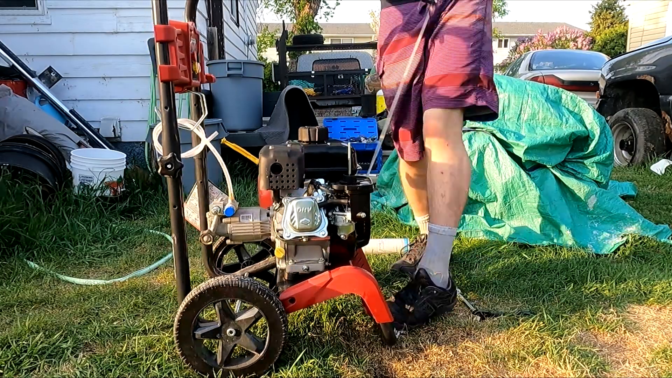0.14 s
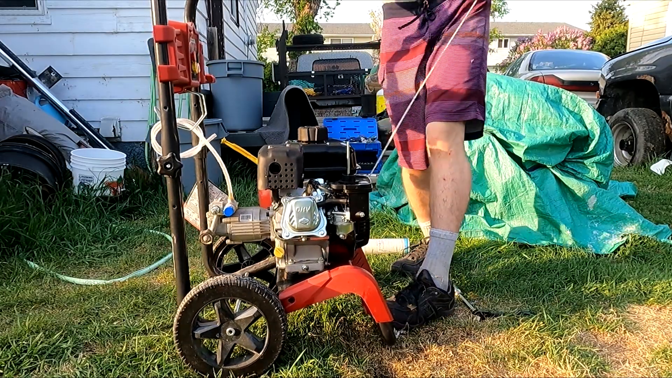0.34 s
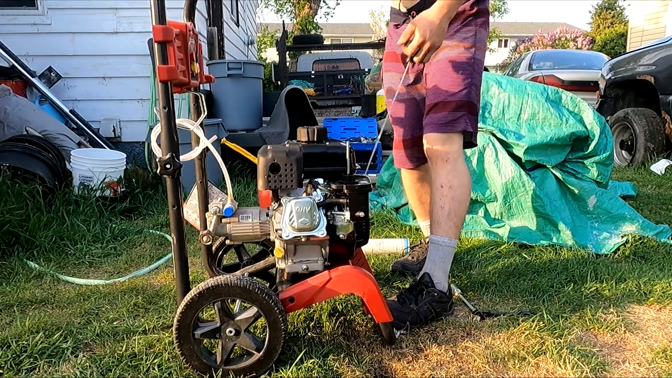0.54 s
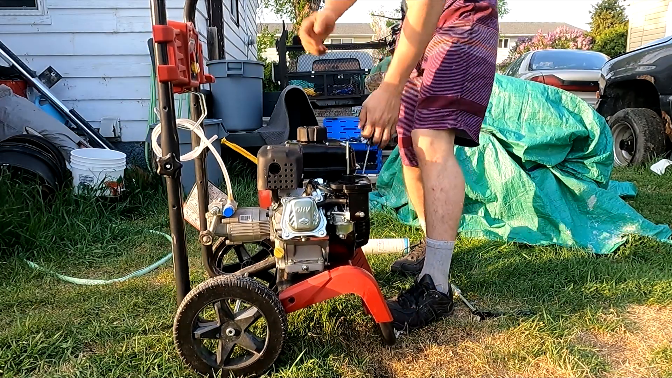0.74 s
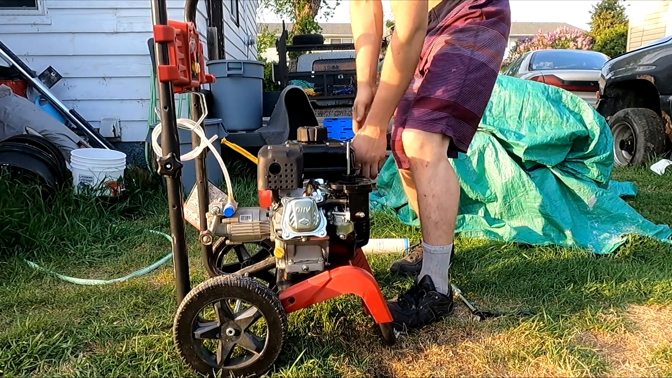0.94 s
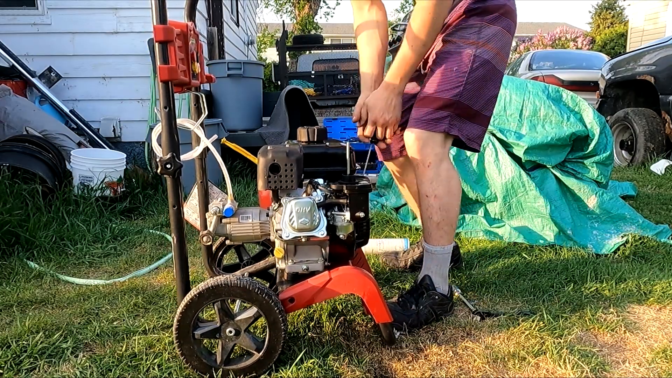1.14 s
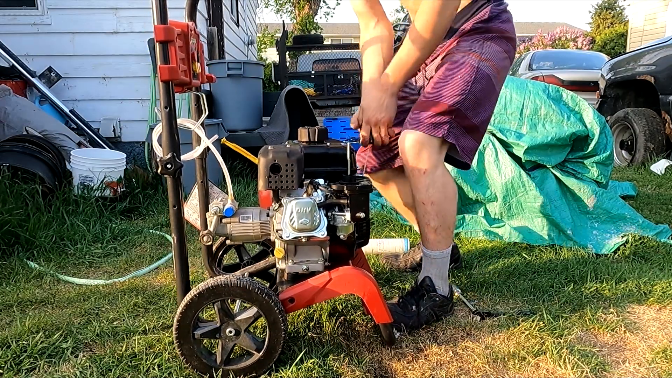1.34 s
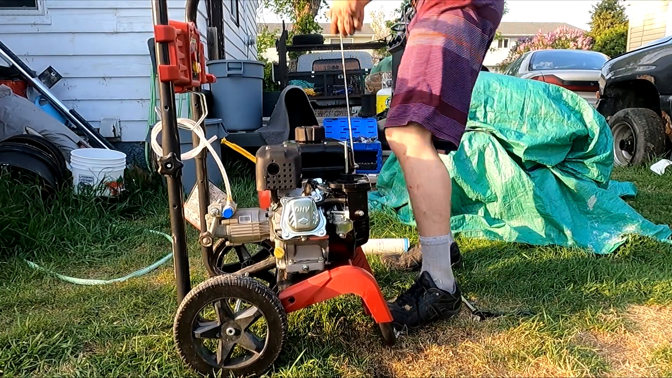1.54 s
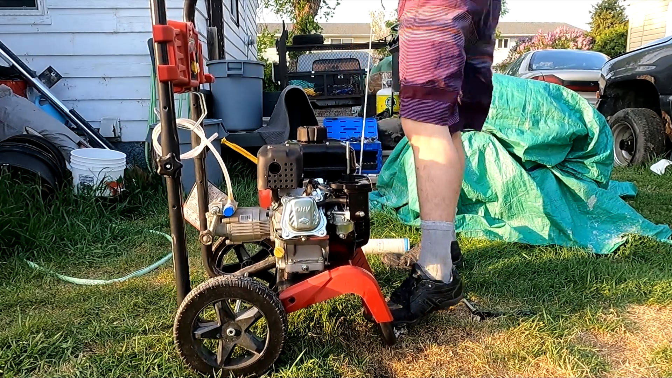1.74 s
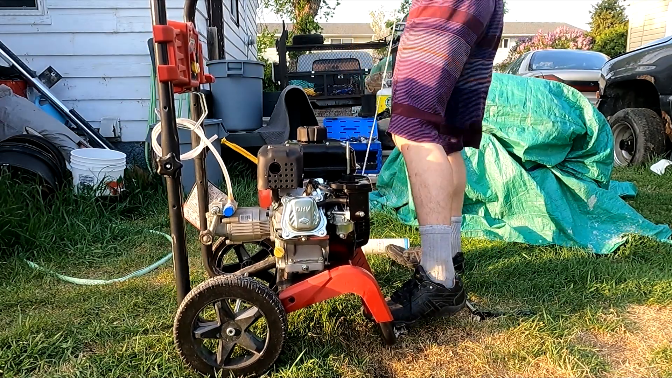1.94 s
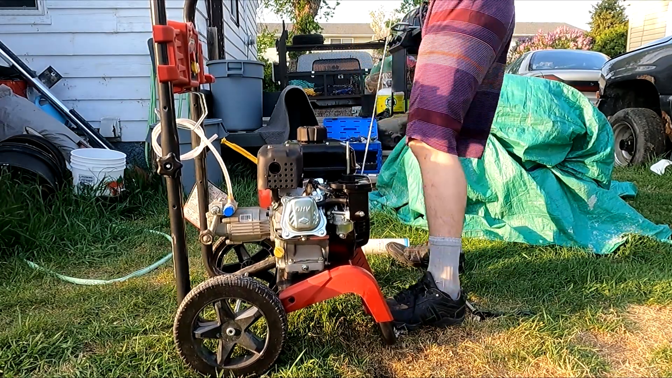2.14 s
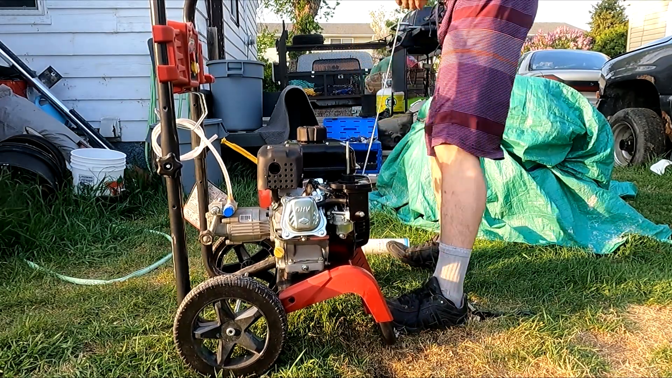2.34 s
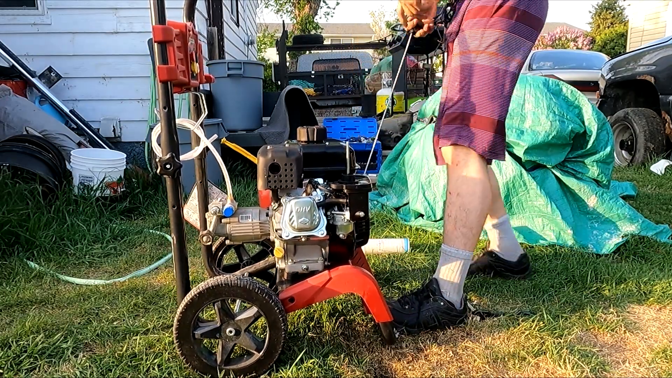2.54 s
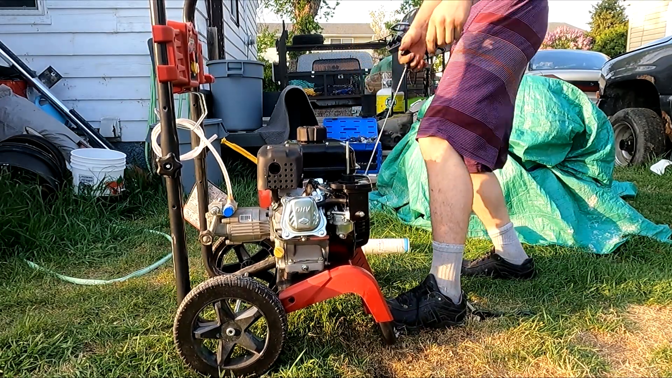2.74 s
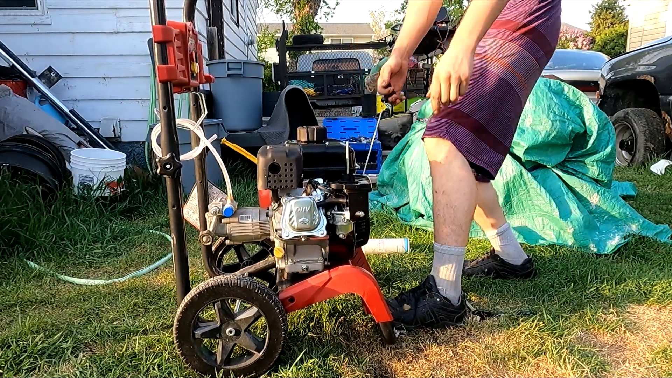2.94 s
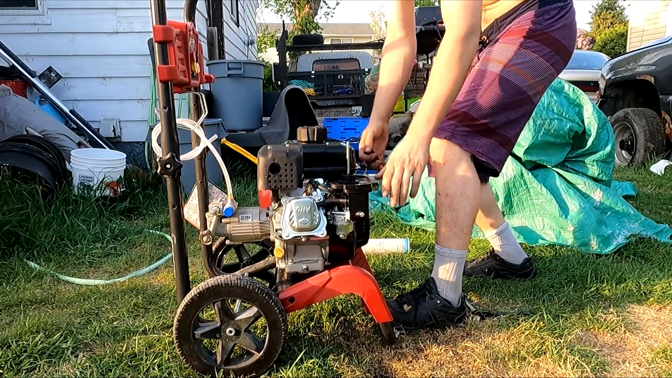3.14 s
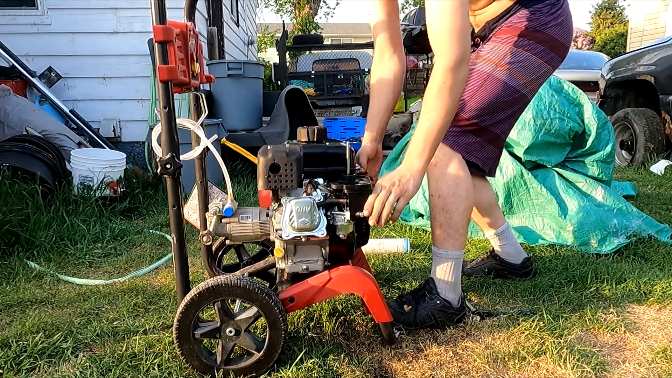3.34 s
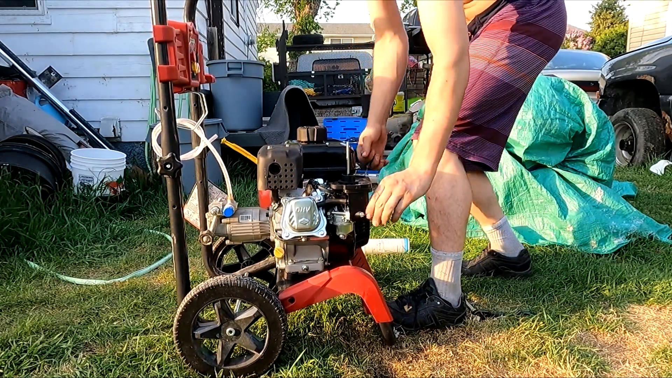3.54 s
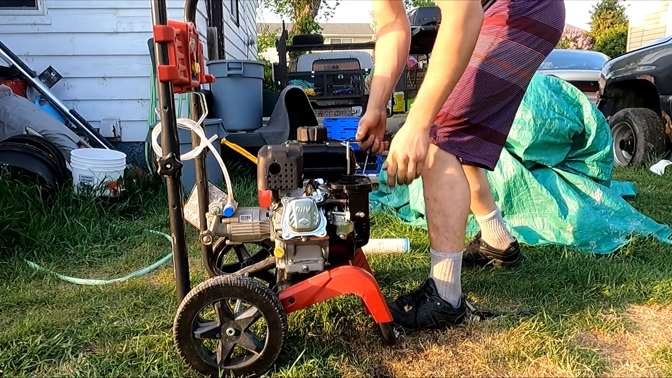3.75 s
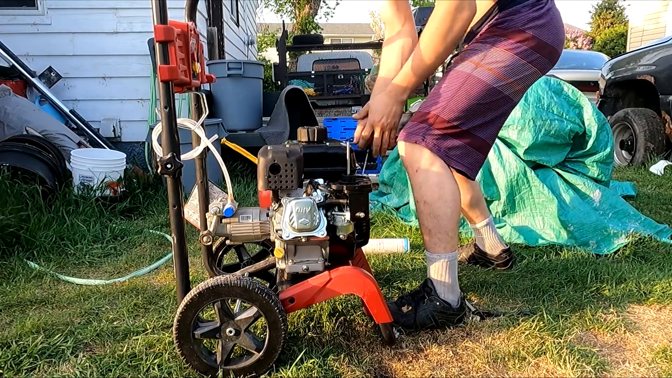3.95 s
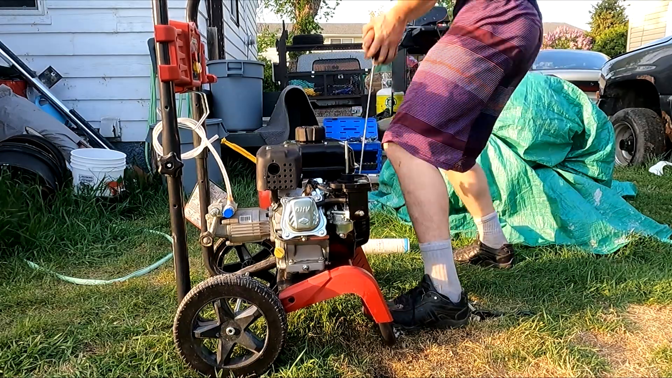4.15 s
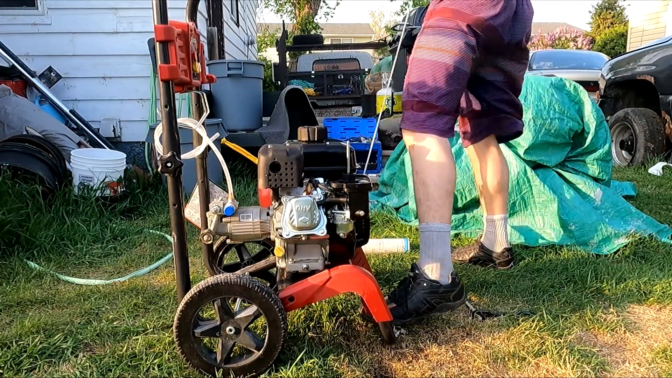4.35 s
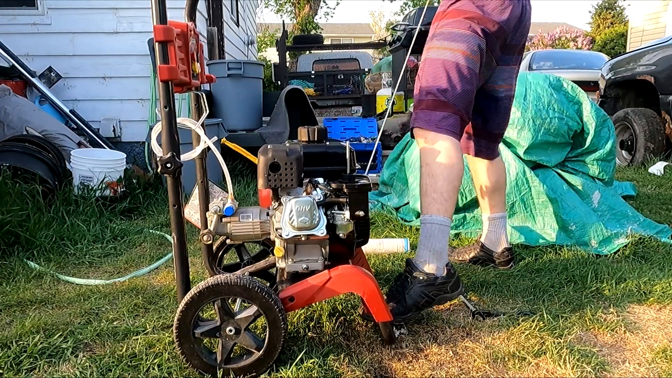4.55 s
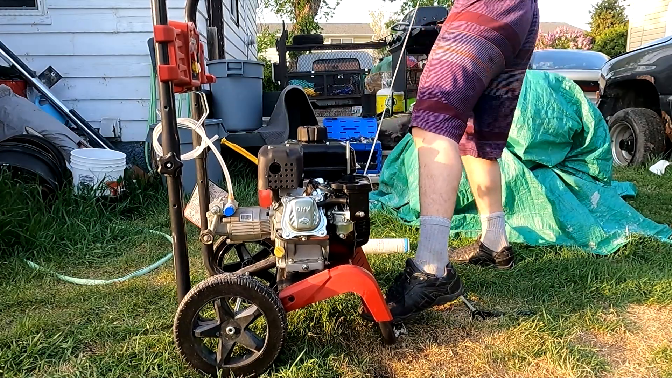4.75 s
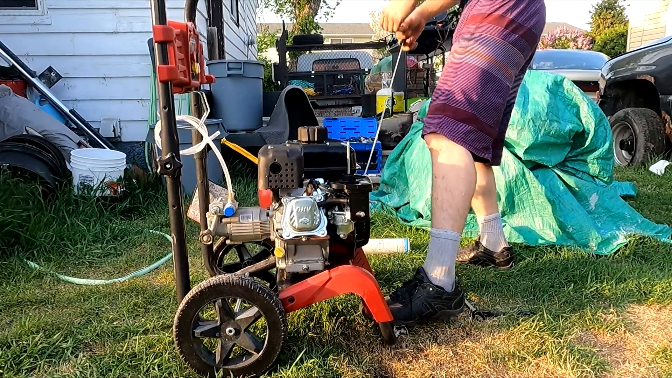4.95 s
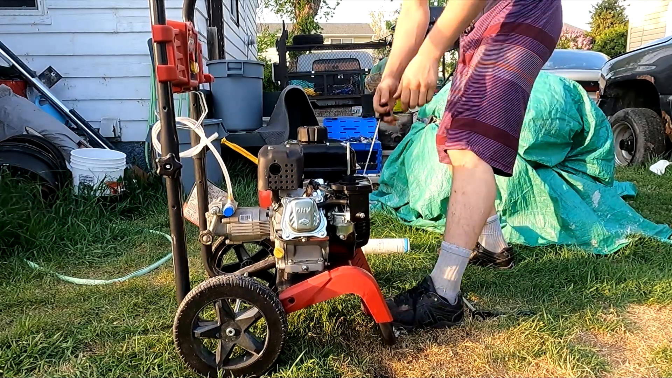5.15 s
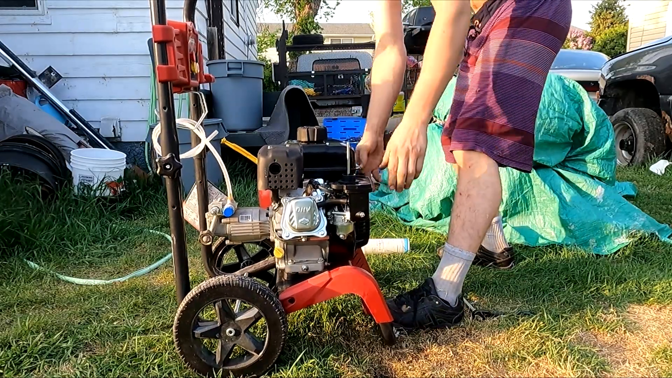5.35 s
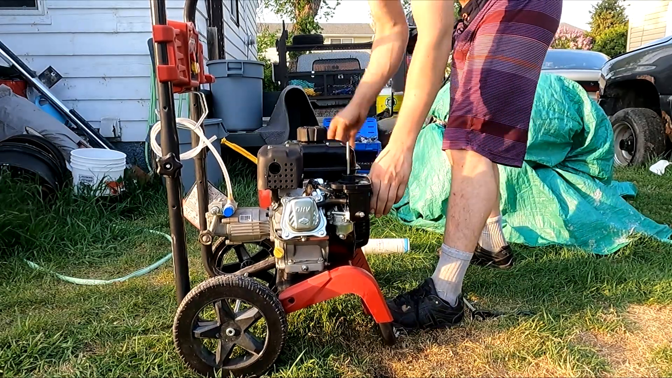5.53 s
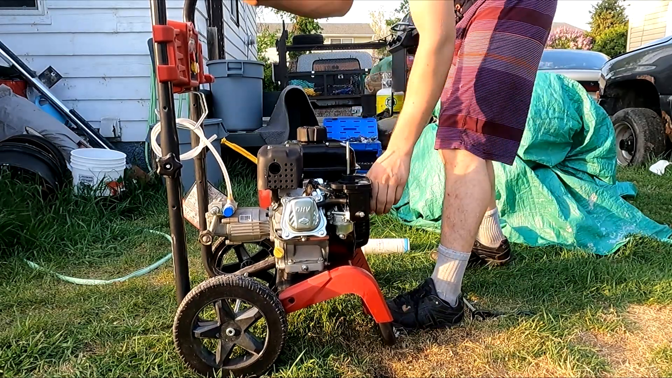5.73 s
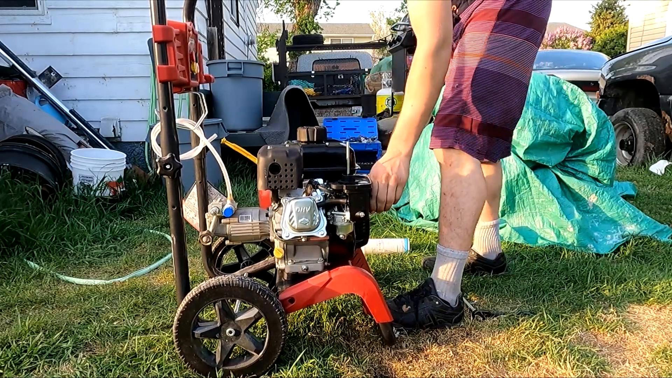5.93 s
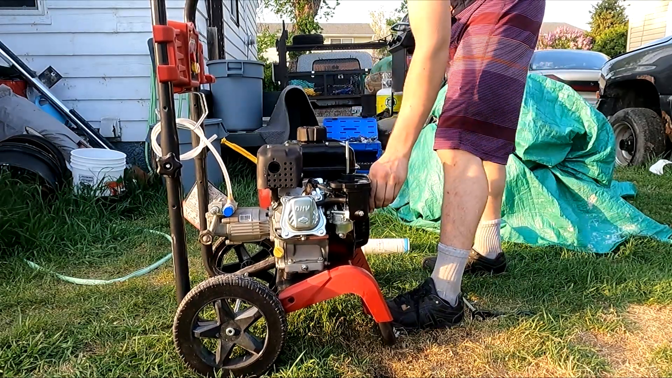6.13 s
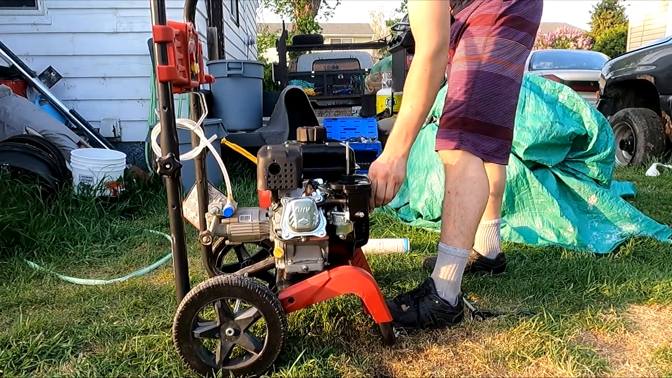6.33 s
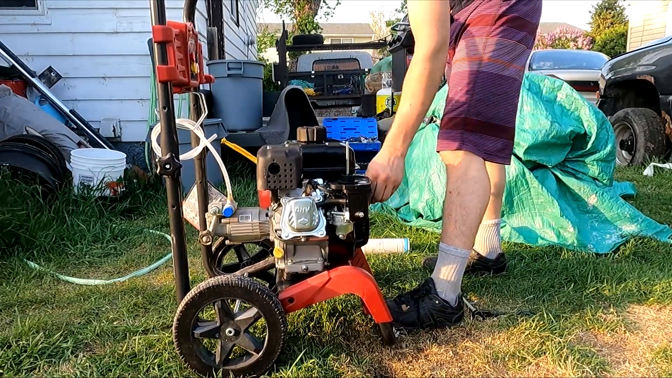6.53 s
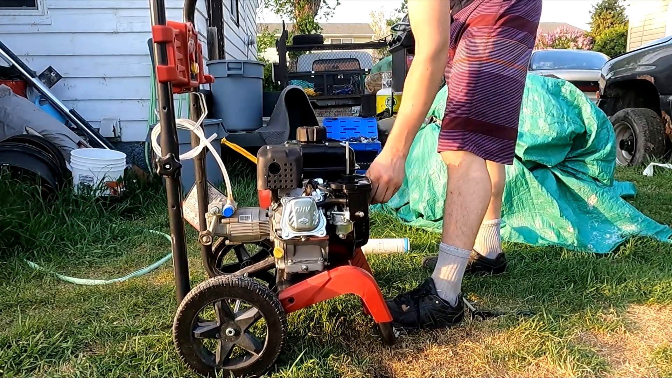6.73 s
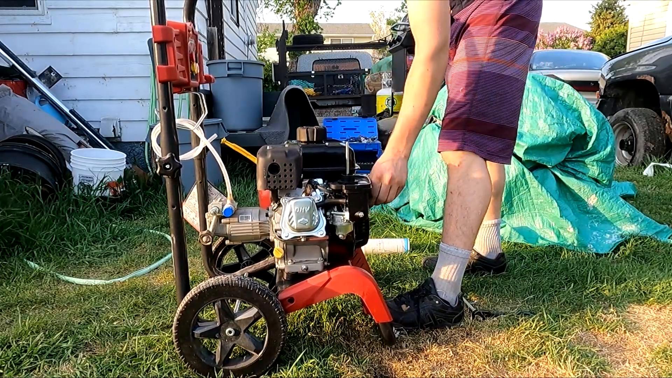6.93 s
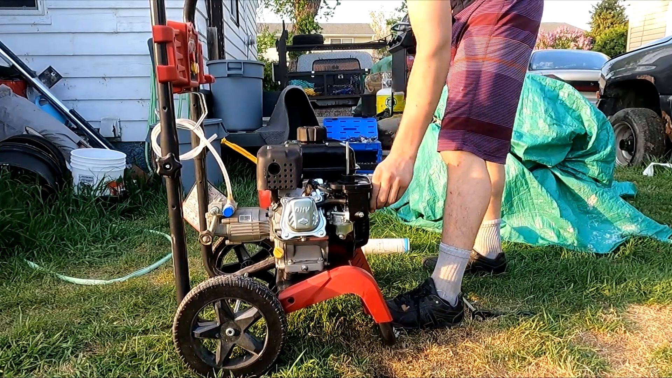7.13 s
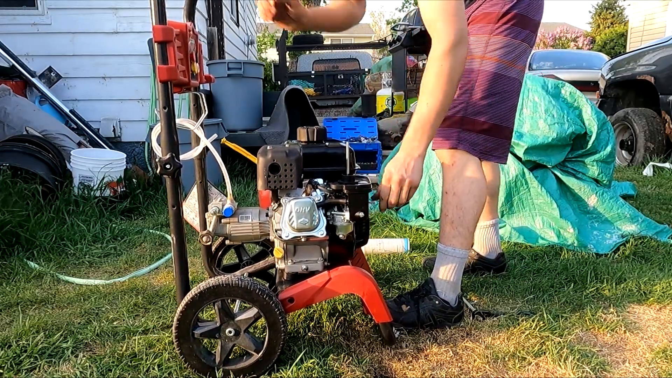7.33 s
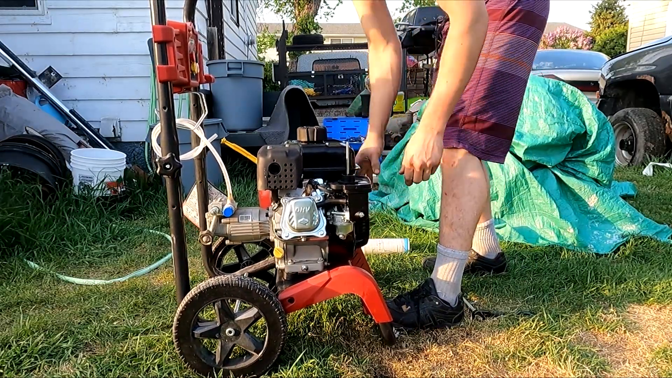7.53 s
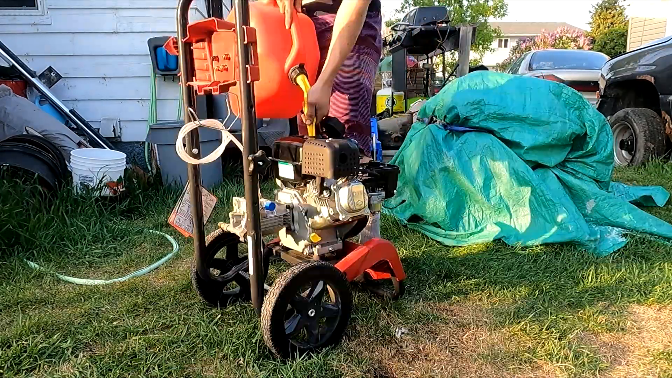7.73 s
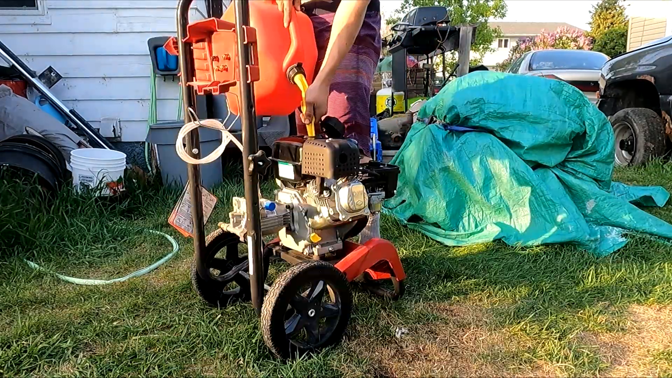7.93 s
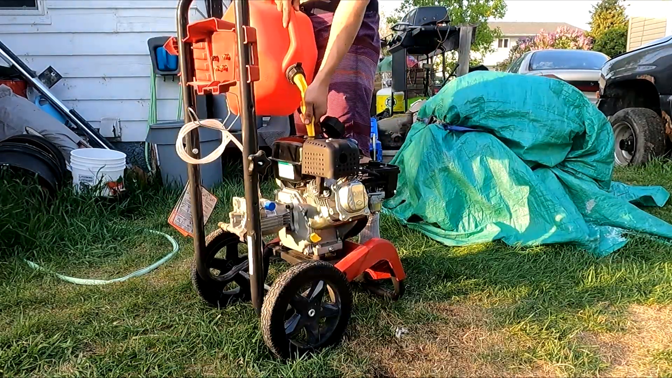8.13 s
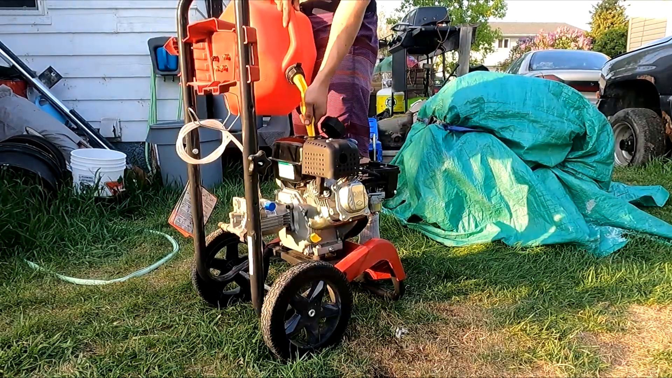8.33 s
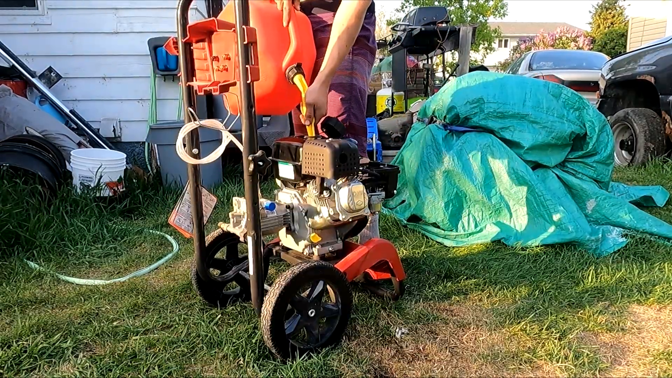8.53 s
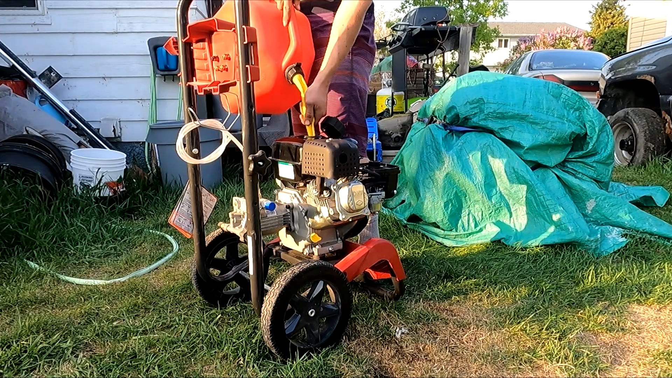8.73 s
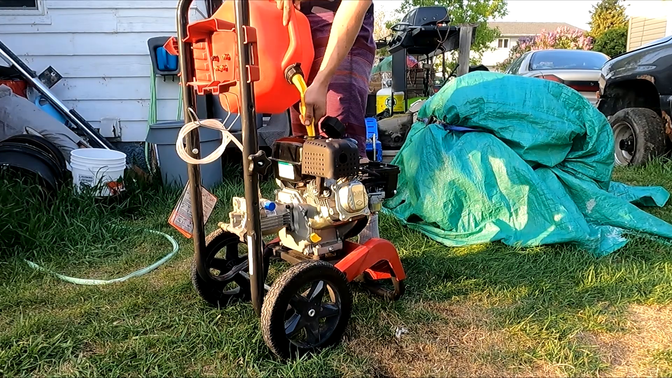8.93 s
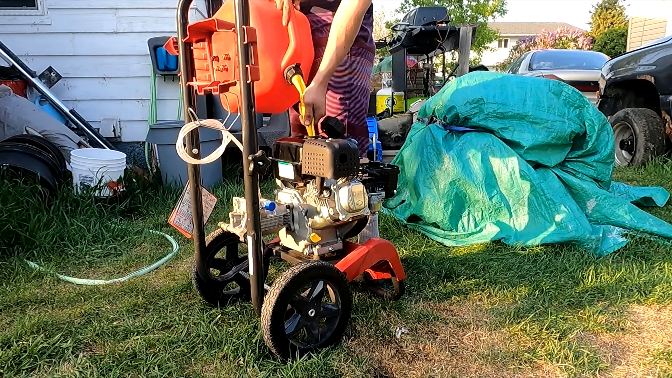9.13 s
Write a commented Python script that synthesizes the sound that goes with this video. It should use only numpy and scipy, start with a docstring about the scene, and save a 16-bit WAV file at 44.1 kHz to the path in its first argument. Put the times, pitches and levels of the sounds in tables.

```python
"""A petrol pressure washer on a lawn by a house wall: filtered-noise breeze, town and grass hiss from the start.
Two pulls of the recoil cord turn it over: gas slugs gulp and puff, grains clatter, starter pawls ring as modes.
The cord rewinds, the handle knocks home as bouncing noise and modes, and gusts buffet the microphone.
On the third pull it fires for a second (muffler booms, intake gulps, valve blows), starves and coasts to a
stop with a thin squeal. A hard cut at 7.812 s jumps from gusts and hiss to calmer air; gusts follow at 9 s."""
import sys
import numpy as np
from scipy import signal
from scipy.fft import rfft, irfft
from scipy.io import wavfile
from scipy.ndimage import uniform_filter1d

SR = 44100
rng = np.random.default_rng(int(sys.argv[2]) if len(sys.argv) > 2 else 0)


def dump(signal):
    """Clip the signal to [-1, 1] and save it as 16-bit WAV at the path in sys.argv[1]."""
    limited = np.clip(np.atleast_2d(signal).T, -1, 1)
    pcm = np.round(limited * 32767).astype(np.int16)
    wavfile.write(sys.argv[1], SR, pcm)


N = 409248
T = np.arange(N) / SR

# Levels are relative; each layer sets its own final gain.

# distant town, spectrum: f/Hz, density/dB
TOWN = [(60, 2.5), (300, -6.5), (1000, -9), (1500, -16.5), (2500, -26.5), (6500, -35.5), (9000, -42.5),
        (14000, -57.5)]
# hiss of grass and tarpaulin until the cut: t/s, level/dB
LEAVES = [(0.7, -60), (4.0, -62.5), (7.0, -84.5), (7.25, -60), (7.55, -62), (7.8, -55.5)]
# light breeze between gusts: t/s, rumble/dB
BREEZE = [(0, -47.5), (1.3, -42.5), (3.1, -37), (4.5, -28), (5.4, -28.5), (6.5, -36), (7.1, -36.5),
          (8.3, -38)]
# gusts on the microphone: start/s, length/s, build-up/s, rumble/dB, buffeting/dB
GUSTS = [(1.424, 0.041, 0.024, -28.5, -48), (2.434, 0.028, 0.0058, -23, -40),
         (2.512, 0.11, 0.014, -24, -34.5), (2.688, 0.042, 0.013, -20, -27.5),
         (2.8, 0.27, 0.016, -31.5, -47), (3.368, 0.12, 0.017, -25, -33.5), (4.11, 0.069, 0.049, -24.5, -29),
         (4.333, 0.079, 0.016, -30, -34), (4.798, .13, 0.044, -19.5, -31), (6.9, 0.041, 0.069, -26, -57),
         (7.182, 0.025, 0.073, -17.5, -26), (7.239, 0.252, 0.023, -25, -35),
         (7.53, 0.0099, .015, -18.5, -30), (7.662, .1, 0.068, -23, -27.5), (7.787, 0.013, 0.031, -25, -22),
         (9.005, 0.06, 0.022, -32, -39), (9.133, 0.026, 0.014, -22, -32), (9.236, 0.053, 0.053, -22, -38.5)]
# turbulence spectrum: f/Hz, density/dB
TURBULENCE = [(15, -17.5), (35, -18.5), (70, -19), (140, -18), (280, -25), (500, -37), (900, -47.5),
              (1300, -63)]
BREEZE_BUFFET_DB = -12.5  # relative to its rumble
GUST_RELEASE_S = 0.021
CUT_S = 7.812  # a hard cut jumps from gusts and hiss to calmer air

# engine block and covers, broad spectrum: f/Hz, level/dB
BLOCK = [(100, -30), (300, -5), (720, -2.5), (1000, -1.5), (2000, -1), (3800, -5.5), (5500, -8.5),
         (8000, -19), (10500, -24), (12500, -28.5), (13800, -39.5), (15500, -61.5)]
# resonances of the covers: f/Hz, width/Hz, level/dB
COVERS = [(598, 79, -4), (900, 130, -3.5), (1115, 70, -0.5), (1520, 60, -1.5), (2430, 51, -8),
          (2630, 45, -4), (2930, 210, -5)]
# pulls of the cord: start/s, end of pull/s, cord wound back/s, clatter/dB, treble/dB
PULLS = [(-.2, 0.138, 0.634, -24.5, -1.5), (1.554, 1.906, 2.58, -24.5, -2), (4.183, 4.567, 5.0, -23.5, -21)]
SPIN_UP_S, RUN_DOWN_DB_PER_S = 0.19, 53.5  # clatter builds under the pull, dies away after it
SNAP_DB = 20.5  # extra treble: contacts are hardest around the end of a pull
REWIND_DB, REWIND_EDGE_S = -51, 0.023  # the spring reels the cord in
SLOW_TREBLE_DB = 2.5  # the light ticking of the rewind is thinner than the pull
TICK_RATE_HZ, TICK_DB = 22, -19  # stray bright ticks of pawls and valve gear

# turns without fire, gulp then puff: t/s, level/dB, delay of puff/s, treble of valve click/dB
TURNS = [(0.0112, -9.5, 0.045, -17), (.145, -13, 0.051, -35), (0.3391, -19.5, 0.1, -18.5),
         (1.697, -11, 0.055, -21.5), (1.8244, -10, 0.048, -17), (1.9578, -12, 0.075, -11),
         (2.195, -24.5, 0.14, -16.5), (4.2427, -17, 0.081, -35.5), (4.417, -11, 0.05, -23.5),
         (4.551, -9.5, 0.046, -20), (4.689, -9, 0.057, -16), (4.877, -14, 0.04, -53),
         (4.979, -18, 0.053, -44), (6.524, -18, 0.06, -21.5), (6.742, -28.5, 0.12, -26)]
VALVE_LEAD_S = 0.0044  # a valve clicks just before each gulp and puff
INLET_DB, EXHAUST_DB, EXHAUST_TREBLE_DB = 5.5, -5.5, -20.5
# metal clicks of pawls and linkage: t/s, level/dB, treble/dB
CLICKS = [(0.069, -22.5, -23), (0.11, -13.5, -7), (0.317, -25.5, -8), (0.788, -31.5, -10.5),
          (1.093, -18.5, -10.5), (1.122, -17, -11), (1.184, -16.5, 5.5), (1.483, -20.5, -24.5),
          (1.496, -14, -20), (1.561, -14.5, -24.5), (1.74, -16.5, -11), (1.762, -12.5, -16),
          (1.861, -14.5, -2.5), (2.164, -25.5, -12), (2.245, -34, -9), (2.422, -34, -5), (3.17, -30.5, -17),
          (3.385, -27, -20), (3.586, -25.5, -30.5), (3.599, -22.5, -24), (4.223, -11.5, -33.5),
          (4.316, -11, -29.5), (4.357, -13, -27.5), (4.539, -10, -13), (4.914, -9, -25), (5.843, -6, -27),
          (6.278, -10, -30), (6.288, -21, -11), (6.399, -11.5, -28), (6.411, -21.5, -14),
          (6.713, -21.5, -26), (7.233, -27, -24), (7.463, -31.5, -30), (7.58, -32.5, -40)]

# resonances of the recoil drum's tin cover: f/Hz, width/Hz, level/dB
DRUM = [(932, 52, -0.5), (1100, 75, 1.5), (1500, 90, -2.5), (2013, 29, -5), (2760, 45, -4.5),
        (2890, 27, -4.5)]
DRUM_DB, DRUM_FADE_DB_PER_S = -29.5, 41
# pawl chatter on the starter cup: t/s, length/s, level/dB, spring twang/dB, share of free ring time
CHATTER = [(0.147, 0.013, -16, -20.5, 0.82), (1.121, 0.0043, -19, -59.5, 0.61),
           (1.897, 0.045, -15.5, -28.5, 0.38), (4.576, 0.015, -17.5, -33.5, 0.69)]
# modes of the steel starter cup: f/Hz, level/dB, t60/s
CUP = [(1770, -4, .09), (2520, -6, 0.12), (2890, -8.5, 0.12), (4950, -10, 0.2), (6930, -8, .16),
       (7060, -8, 0.2), (7706, -5, 0.08), (8860, -12, 0.08)]
# cord whirs in its guide: t/s, length/s, first f/Hz, last f/Hz, level/dB
WHIRS = [(1.635, 0.067, 1990, 2530, -28.5), (1.673, 0.019, 800, 1490, -25),
         (1.699, 0.018, 2720, 2910, -23.5), (4.192, .045, 762, 1610, -29.5),
         (4.31, 0.056, 2250, 3210, -29.5)]
# chirps of the taut cord slipping: t/s, level/dB, centre f/Hz
CHIRPS = [(0.164, -16, 1950), (1.716, -18.5, 2150), (1.748, -19.5, 2100), (4.393, -19.5, 2160),
          (4.593, -15, 2510), (4.719, -22, 2080)]
CHIRP_HALF_S, CHIRP_FALL_PER_S = 0.004, 20  # 1/e half-length; relative fall of pitch
# dull clacks of pulley and drive slack: t/s, level/dB, centre f/Hz
CLACKS = [(0.21, -21.5, 1700), (.241, -26, 2900), (0.335, -22, 1980), (1.592, -23, 1100),
          (1.796, -15.5, 2600), (1.955, -16.5, 1480), (2.079, -26, 2680), (4.164, -25, 1600),
          (4.219, -24.5, 1640), (4.351, -20, 2800), (4.523, -18, 1990), (4.739, -17, 2620),
          (5.019, -26.5, 2820), (6.393, -19.5, 2430), (6.635, -28, 2390)]
# slides of cord and clothing: t/s, length/s, level/dB
RUSTLES = [(0.941, 0.091, -40), (1.152, 0.074, -35), (3.095, 0.075, -48), (3.19, 0.044, -47.5),
           (3.415, 0.081, -46.5), (3.603, 0.047, -43), (3.719, 0.034, -33)]
# knocks of the cord handle on the housing: t/s, level/dB, hardness f/Hz, hollow boom/dB
KNOCKS = [(1.179, -21, 8090, -7.5), (3.713, -30.5, 1397, 12.5)]
# modes of handle and housing: f/Hz, level/dB, t60/s
HOUSING = [(207.5, -2, 0.36), (340, -4, 0.091), (468, -5, 0.17), (557, -3.5, 0.33), (900, 2.5, 0.13),
           (1090, 2.5, 0.2), (1426, 0, 0.14), (1755, 3, 0.24), (2020, -7.5, .18), (2900, -1, 0.16)]
# modes of the hollow starter cover: f/Hz, level/dB, t60/s
HOLLOW = [(469.6, 3, 0.16), (636, 6, 0.05)]
BOUNCES, BOUNCE_S, BOUNCE_DB = 4, 0.0065, -3  # touches, spacing, loss per touch
# hard single eddies on the microphone: t/s, level/dB, upper edge f/Hz
THUMPS = [(2.44, -32, 370), (2.528, -21, 447), (2.675, -15.5, 446), (2.711, -18, 900), (2.852, -24, 310),
          (3.4, -20, 400), (4.109, -14, 380), (4.162, -18.5, 420), (7.177, -13.5, 510), (7.2, -13, 410),
          (7.544, -16.5, 340), (9.135, -13, 310)]
THUMP_HALF_S = 0.0055  # 1/e half-length

# crank angle while firing: t/s, four-stroke cycles done
CRANK = [(4.96, -.9), (5.043, 0), (5.122, 1), (5.185, 2), (5.293, 4), (5.389, 6), (5.569, 10), (5.746, 14),
         (5.841, 16), (5.891, 17), (5.944, 18), (6.002, 19), (6.064, 20), (6.134, 21), (6.213, 22),
         (6.305, 23), (6.42, 23.9)]
# strength of the strokes: t/s, exhaust/dB, intake/dB
POWER = [(5.04, -10.5, -37), (5.2, -12.5, -25), (5.45, -10.5, -12), (5.75, -12, -10), (5.88, -14.5, -6),
         (6.07, -16, -11), (6.23, -19, -13), (6.33, -18.5, -20.5)]
# blows of valves and piston: share of cycle, level/dB, low edge f/Hz, high edge f/Hz, t60/s
BLOWS = [(-0.225, -6.5, 500, 3740, 0.05), (-0.085, -6.5, 3010, 8960, 0.094), (-0.1, -7, 348, 3254, 0.047),
         (0.2, 2, 328, 720, 0.048), (0.251, -6.5, 1000, 3600, 0.06), (0.44, -6.5, 1510, 3550, 0.045),
         (0.598, -7.5, 820, 1700, 0.022)]
# gulp position in the cycle, plus the time the air takes to move
INTAKE_SHARE, INTAKE_LAG_S = 0.1466, 0.0048
STROKE_SCATTER_DB, STROKE_JITTER_S = 0.8, 0.00056
# the engine catches, picks up, starves and is braked to rest by friction
CATCH_S, PICK_UP_S, STARVE_S, REST_S = 4.53, 0.36, 5.68, 6.97
RUN_DB, RUN_TREBLE_DB, COAST_TREBLE_DB, COAST_EXPONENT = -25.5, -8, -6, 1.02
THROB_DB = 0.5  # clatter is loudest at each firing
# squeal as the engine winds down: t/s, share of full strength
SQUEAL = [(5.4, 0), (5.8, .8), (6.42, 1), (6.62, 0)]
# stereo width, nearly mono by 3.7 s: t/s, side/dB
WIDTH = [(.2, 2), (.7, 3), (1.3, 4.5), (1.8, 2.5), (2.5, 4.5), (2.9, 4), (3.3, -8), (3.7, -24)]
TOP_HZ = 15400


def undb(db):
    """Decibels to gain."""
    return 10 ** (np.asarray(db) / 20)


def decibels(gain):
    """Gain to decibels."""
    return 20 * np.log10(gain + 1e-9)


def unit(x):
    """Scale to rms 1."""
    return x / np.sqrt(np.mean(x ** 2))


def curve(rows):
    """Columns of a table, joined by straight lines in time."""
    t_s, *columns = np.transpose(rows)
    return [np.interp(T, t_s, column) for column in columns]


def shape_db(points, hz):
    """Read a spectrum on a log-frequency axis."""
    f_hz, db = np.transpose(points)
    return np.interp(np.log(hz + 1), np.log(f_hz), db)


def held(start_s, end_s, attack_s, release_s):
    """Full between two times, exponential attack before and release after."""
    before = np.minimum((T - start_s) / attack_s, 0)
    after = np.maximum((T - end_s) / release_s, 0)
    return np.exp(np.maximum(before - after, -40))


def fade(t60_s):
    """One second of exponential decay."""
    return np.exp(-np.log(1000) * T[:SR] / t60_s)


def convolve(x, response):
    """Pass a sound through a response."""
    return signal.fftconvolve(x, response)[:N]


def colour(x, points, size=1024):
    """Minimum-phase filter of unit power with the given spectrum, by the folded cepstrum."""
    log_gain = shape_db(points, np.fft.rfftfreq(size, 1 / SR)) * np.log(10) / 20
    cepstrum = irfft(log_gain)
    cepstrum[1:size // 2] *= 2
    cepstrum[size // 2 + 1:] = 0
    response = irfft(np.exp(rfft(cepstrum)))
    return convolve(x, response / np.linalg.norm(response))


def cut(x, hz, kind, order=2):
    """Low-, high- or band-pass."""
    sos = signal.butter(order, np.minimum(hz, SR / 2 - 1), kind, fs=SR, output="sos")
    return signal.sosfilt(sos, x)


def resonate(x, hz, width_hz):
    """One resonance, gain 1 at its centre."""
    return signal.lfilter(*signal.iirpeak(hz, hz / width_hz, fs=SR), x)


def ring(x, modes):
    """Drive a set of decaying modes."""
    t_s = T[:SR]
    return convolve(x, sum(undb(db) * fade(t60_s) * np.sin(2 * np.pi * hz * t_s) for hz, db, t60_s in modes))


def tones(starts, sizes, hz, t60_s):
    """One decaying tone per tap, each at its own pitch."""
    out, decay = np.zeros(N + SR), fade(t60_s)[:int(t60_s * SR)]
    for i, size, f_hz in zip(starts, sizes, hz):
        out[i:i + len(decay)] += size * decay * np.sin(2 * np.pi * f_hz * T[:len(decay)])
    return out[:N]


def impulses(times_s, sizes):
    """Single-sample kicks at the given times."""
    return np.bincount(np.clip(np.asarray(times_s) * SR, 0, N - 1).astype(int), sizes, N)


def walk(rate_hz):
    """Bounded random line: uniform points of unit spread, joined straight."""
    count = int(T[-1] * rate_hz) + 2
    return np.interp(T * rate_hz, np.arange(count), np.sqrt(3) * rng.uniform(-1, 1, count))


def grains(rate_hz, spread_db):
    """Dense tiny impacts of very unequal size, rms 1."""
    sizes = undb(spread_db * np.minimum(rng.exponential(size=N), 5)) * rng.choice([-1, 1], N)
    return unit(sizes * (rng.random(N) < rate_hz / SR))


def pings(rate_hz, t60_s, low_hz, high_hz):
    """Small parts touch one after another, each with its own brief pitch."""
    when, pitch, strength = rng.random((int(rate_hz * T[-1]), 3)).T
    hz = low_hz * (high_hz / low_hz) ** pitch
    return unit(tones((when * N).astype(int), undb(6 * strength), hz, t60_s))


def casing(x):
    """Impacts ring through the block and its tin covers."""
    covers = sum(undb(db) * resonate(x, hz, width_hz) for hz, width_hz, db in COVERS)
    return colour(x + covers, BLOCK)


def panels(x, t60_s, share):
    """Thin panels add a thicket of close, short resonances, as a decaying noise response."""
    response = rng.standard_normal(SR) * fade(t60_s)
    return (x + share * convolve(x, response / np.linalg.norm(response))) / np.hypot(1, share)


def brighten(x, treble_db):
    """Harder contacts put more into the top octaves, most into the very top."""
    top = signal.sosfiltfilt(signal.butter(2, 6800, "high", fs=SR, output="sos"), x)
    return x + (undb(treble_db) - 1) * top


def gas_pulse(kicks, width_s, lead=1):
    """A bell-shaped slug of gas radiates its rate of change; lead draws out its front."""
    u = (T[:4097] - T[2048]) / width_s
    stretch = np.where(u < 0, lead, 1)
    u = u / stretch
    return signal.fftconvolve(kicks, -u * np.exp((1 - u ** 2) / 2) / stretch, "same")


def strokes(share, strength_db, lag_s=0):
    """A kick at the given share of each firing cycle, a little uneven in time and strength."""
    t_s, cycles = np.transpose(CRANK)
    times_s = np.interp(np.arange(np.ceil(cycles[-1])) + share, cycles, t_s) + lag_s
    late, strong = rng.standard_normal((len(times_s), 2)).T
    db = np.interp(times_s, T, strength_db) + STROKE_SCATTER_DB * strong
    return impulses(times_s + STROKE_JITTER_S * late, undb(db))


def town():
    """Far traffic: coloured noise, swelling slightly."""
    return undb(-51.0 + 1.0 * walk(1.1)) * colour(rng.standard_normal(N), TOWN)


def leaves():
    """Wind stirs grass and tarpaulin: dense grains coloured into a faint hiss."""
    spectrum = [(700, 1.0), (1500, 8.0), (3000, 2.0), (6200, -0.5), (8000, -12.5), (12000, -27.0), (15000, -48.0)]
    hiss = colour(grains(rate_hz=4000, spread_db=1.0), spectrum)
    return undb(curve(LEAVES)[0] + 0.48 * walk(24)) * (T < CUT_S) * hiss


def gusts():
    """Gusts add their power to the breeze: (rumble dB, buffeting dB)."""
    rumble = undb(curve(BREEZE)[0]) ** 2
    buffet = rumble * undb(BREEZE_BUFFET_DB) ** 2
    for start_s, length_s, build_up_s, rumble_db, buffet_db in GUSTS:
        same_side_of_cut = (T < CUT_S) == (start_s < CUT_S)
        gust = held(start_s, start_s + length_s, build_up_s, GUST_RELEASE_S) * same_side_of_cut
        rumble = rumble + (gust * undb(rumble_db)) ** 2
        buffet = buffet + (gust * undb(buffet_db)) ** 2
    return decibels(np.sqrt(rumble)), decibels(np.sqrt(buffet))


def wind():
    """Eddies at the microphone as half-octave noise bands; harder gusts reach higher."""
    rumble_db, buffet_db = gusts()
    eddies, out = walk(45), 0
    for hz in np.geomspace(20, 1280, 13):
        reach = np.clip(np.log2(hz / 75) / 2, 0, 1.35)  # 0 follows the rumble, 1 the buffeting
        edges_hz = hz * 2 ** (np.array([-1, 1]) / 4)
        band = unit(cut(rng.standard_normal(N), edges_hz, "band", order=3))
        band_width_db = 10 * np.log10(hz * 0.39)
        db = rumble_db + reach * (buffet_db - rumble_db) + shape_db(TURBULENCE, hz) + band_width_db
        out = out + band * undb(db + 3.6 * reach * eddies - 2.0 * reach)
    return out


def pulled():
    """Each pull spins the works up; they run down as the cord rewinds: (gain, treble dB) per pull."""
    for start_s, end_s, wound_s, db, treble_db in PULLS:
        spin_up = np.clip((T - start_s) / SPIN_UP_S + 0.067, 0, 1)
        spin = spin_up * undb(db - RUN_DOWN_DB_PER_S * np.maximum(T - end_s, 0))
        rewind = undb(REWIND_DB) * held(end_s, wound_s, REWIND_EDGE_S, REWIND_EDGE_S)
        snap_db = SNAP_DB * held(end_s, end_s, attack_s=0.039, release_s=0.027)
        slow_db = SLOW_TREBLE_DB * rewind / (spin + rewind + 1e-9)
        yield np.hypot(spin, rewind), treble_db + snap_db + slow_db


def running():
    """The engine picks up, throbs with each cycle and coasts to rest: (gain, treble dB)."""
    pick_up = np.sqrt(np.clip((T - CATCH_S) / PICK_UP_S, 0, 1))
    momentum = np.clip((REST_S - T) / (REST_S - STARVE_S), 0, 1)
    throb_db = THROB_DB * np.cos(2 * np.pi * curve(CRANK)[0])
    gain = pick_up * momentum ** COAST_EXPONENT * undb(RUN_DB + throb_db)
    return gain, RUN_TREBLE_DB + COAST_TREBLE_DB * (1 - momentum)


def clatter():
    """Pulley, gears and valve gear: a hail of impacts and pings, ragged when slow, steadier at speed."""
    gains, trebles_db = np.array([*pulled(), running()]).transpose(1, 0, 2)
    power = np.sum(gains ** 2, axis=0)
    treble_db = np.sum(gains ** 2 * trebles_db, axis=0) / (power + 1e-18)
    cycle_hz = uniform_filter1d(np.gradient(curve(CRANK)[0]) * SR, SR // 10)
    ragged = 1 / (1 + cycle_hz / 18)
    hail = grains(rate_hz=900, spread_db=2.3)
    rattle = unit(casing(hail * undb(3.3 * ragged * walk(110))))
    tinkle = unit(casing(pings(rate_hz=220, t60_s=0.035, low_hz=850, high_hz=5600)))
    jingle = unit(casing(pings(rate_hz=250, t60_s=0.04, low_hz=6000, high_hz=13000)))
    tick_envelope = convolve(1. * (rng.random(N) < TICK_RATE_HZ / SR), fade(0.013))
    ticks = unit(cut(casing(tick_envelope * rng.standard_normal(N)), 6000, "high"))
    works = 0.92 * rattle + 0.88 * tinkle + undb(-16.5) * jingle + undb(TICK_DB) * ticks
    works = unit(panels(works, t60_s=0.035, share=0.65))
    return brighten(works, treble_db) * np.sqrt(power) * undb(-1.95)


def intake(kicks, width_s, airbox_db, lead, wander, t60_s):
    """A short suck, cut off by the valve, rings the air box at a pitch that shifts with each gulp."""
    at = np.flatnonzero(kicks)
    hz = 549 * (1 + wander * rng.uniform(-0.85, 1, len(at)))
    airbox = tones(at, kicks[at], hz, t60_s) + ring(kicks, [(223, -12.0, 0.092)])
    return -gas_pulse(kicks, width_s, lead) + undb(airbox_db) * airbox


def cranking():
    """Turning without fire, the cylinder gulps air and pushes it softly out of the muffler."""
    t_s, db, delay_s, _ = np.transpose(TURNS)
    gulps, puffs = impulses(t_s, undb(db)), impulses(t_s + delay_s, undb(db))
    slug = gas_pulse(puffs, width_s=0.0022)
    suck = intake(gulps, width_s=0.0015, airbox_db=-11.5, lead=1.1, wander=0.021, t60_s=0.12)
    return suck + 0.5 * slug + 0.47 * resonate(slug, 69, 49)


def clicks():
    """Metal meets metal in linkage and valves: a short noise crack, then the tin cover rings."""
    inlet = [(s - VALVE_LEAD_S, db + INLET_DB, treble_db) for s, db, _, treble_db in TURNS]
    exhaust = [(s + delay_s - VALVE_LEAD_S, db + EXHAUST_DB, EXHAUST_TREBLE_DB) for s, db, delay_s, _ in TURNS]
    t_s, db, treble_db = np.transpose(CLICKS + inlet + exhaust)
    bright_db = db + np.minimum(treble_db + 18.5, 15)
    crack = fade(0.028) - fade(0.005)
    noise = rng.standard_normal(N)
    plain = casing(noise * convolve(impulses(t_s, undb(db)), crack + undb(-10.5) * fade(0.16)))
    bright = casing(noise * convolve(impulses(t_s, undb(bright_db)), crack + undb(-11.0) * fade(0.15)))
    bright = panels(bright, t60_s=0.02, share=0.7)
    kicks = impulses(t_s, undb(db + 2 * rng.standard_normal(len(t_s))))
    cover = ring(kicks, [(hz, mode_db, 0.11) for hz, _, mode_db in DRUM])
    low = undb(-15.0) * cut(plain, 6074, "low", order=4)
    high = undb(-9) * cut(bright, 5100, "high", order=4)
    return low + high + undb(-28.5) * cover


def drum():
    """After each pull the drum freewheels, its fine ticking ringing the cover ever more faintly."""
    ticking = cut(grains(rate_hz=350, spread_db=2.2), [800, 3200], "band", order=3)
    whir = unit(sum(undb(db) * resonate(ticking, hz, width_hz) for hz, width_hz, db in DRUM))
    spin = 0
    for _, end_s, wound_s, *_ in PULLS:
        run_down = undb(-DRUM_FADE_DB_PER_S * np.maximum(T - end_s, 0))
        spin = spin + held(end_s, wound_s, attack_s=0.061, release_s=0.03) * run_down
    return undb(DRUM_DB) * spin * whir


def pawls():
    """The flywheel flicks the pawls; the cup rings a little differently each time, the spring twangs."""
    out = 0
    for start_s, length_s, db, twang_db, ring_share in CHATTER:
        engaged = (T > start_s) & (T < start_s + length_s)
        taps = undb(db) * engaged * grains(rate_hz=1500, spread_db=1.5)
        cup = [(hz * (1 + 0.002 * rng.standard_normal()), mode_db, t60_s * ring_share)
               for hz, mode_db, t60_s in CUP]
        spring = ring(impulses([start_s], [undb(twang_db)]), [(935.0, 0.0031, 0.36)])
        out = out + undb(-28.5) * ring(taps, cup) + undb(-19) * casing(taps) + spring
    return out


def cord():
    """The braid whirs over the guide in short rising scrapes, and chirps where it slips."""
    rasp, out = 0.62 + 0.7 * unit(cut(rng.standard_normal(N), 130, "low")), np.zeros(N)
    for start_s, length_s, first_hz, last_hz, db in WHIRS:
        u = np.linspace(0, 1, int(length_s * SR))
        span = int(start_s * SR) + np.arange(len(u))
        phase = 2 * np.pi * np.cumsum(first_hz * (last_hz / first_hz) ** u) / SR
        swell = np.sqrt(2 * np.abs(np.sin(np.pi * u)))
        out[span] += undb(db) * swell * rasp[span] * np.sin(phase)
    u = T[:2048] - T[1024]  # s from the middle of a chirp
    for centre_s, db, hz in CHIRPS:
        span = int((centre_s + u[0]) * SR) + np.arange(len(u))
        phase = 2 * np.pi * hz * u * (1 - CHIRP_FALL_PER_S * u / 2)
        out[span] += undb(db) * np.exp(-(u / CHIRP_HALF_S) ** 2) * np.sin(phase)
    return out


def clacks():
    """Loose parts take up their slack: brief noise around one pitch."""
    out = 0
    for s, db, hz in CLACKS:
        envelope = held(s + 0.002, s + 0.0083, attack_s=0.0014, release_s=0.0045)
        blow = undb(db) * envelope * rng.standard_normal(N)
        out = out + np.sqrt(SR / hz) * cut(blow, [hz * 0.66, hz * 1.25], "band")
    return 0.39 * out


def rustles():
    """Cord and cloth slide in soft swells full of tiny ticks."""
    swell = sum(undb(db) * np.exp(-(2 * (T - s) / length_s) ** 2) for s, length_s, db in RUSTLES)
    fibres = panels(grains(rate_hz=900, spread_db=2.2) * undb(3.2 * walk(70)), t60_s=0.07, share=0.8)
    spectrum = [(300, -10.5), (1000, 7.0), (2500, 11.0), (6000, 1.5), (9000, -10.0), (12500, -27), (15000, -41.5)]
    return swell * colour(fibres, spectrum)


def handle():
    """The plastic handle snaps home, bounces on the housing and sounds the hollow cover."""
    cracks, kicks, booms, touch = 0, 0, 0, np.arange(BOUNCES)
    crack = fade(0.025) + undb(-10) * fade(0.14)
    for s, db, hard_hz, hollow_db in KNOCKS:
        kick = impulses([s], [undb(db)])
        touches = impulses(s + BOUNCE_S * touch, undb(db + BOUNCE_DB * touch))
        noise = convolve(touches, crack) * rng.standard_normal(N)
        cracks = cracks + cut(noise, hard_hz, "low", order=1)
        kicks, booms = kicks + kick, booms + undb(hollow_db) * kick
    shell = undb(-6.5) * ring(kicks, HOUSING) + undb(-5.5) * ring(booms, HOLLOW)
    shell = panels(shell, t60_s=0.06, share=0.6)
    return 0.85 * shell + undb(-3.0) * casing(cracks) + undb(-1.5) * cut(cracks, [150, 700], "band")


def thumps():
    """Single eddies strike the microphone, each a short dull knock of filtered noise."""
    out = 0
    for s, db, hz in THUMPS:
        air = unit(cut(cut(rng.standard_normal(N), hz, "low", order=6), hz / 6, "high"))
        out = out + undb(db) * np.exp(-((T - s) / THUMP_HALF_S) ** 2) * air
    return undb(-5.5) * out


def valve_gear():
    """Short blows at fixed crank angles: the low ring keeps its waveform, the spit is new each time."""
    exhaust_db, out = curve(POWER)[0] - 4 * np.clip((T - 5.75) / 0.2, 0, 1), 0  # softer as it slows
    for share, db, low_hz, high_hz, t60_s in BLOWS:
        kicks, burst = strokes(share, exhaust_db + db), fade(t60_s) * (1 - fade(0.0068))
        thud = cut(convolve(kicks, burst * rng.standard_normal(SR)), 770, "low")
        spit = cut(convolve(kicks, burst) * grains(rate_hz=6000, spread_db=0.7), 850, "high")
        out = out + cut(thud + spit * undb(2.2 * walk(60)), [low_hz, high_hz], "band")
    return 0.96 * casing(out)


def firing():
    """Each cycle booms in the muffler, the intake answers; as the engine starves the gulp outgrows the boom."""
    exhaust_db, intake_db = curve(POWER)
    slug = gas_pulse(strokes(0, exhaust_db), width_s=0.0016)
    boom = 0.6 * slug + 0.47 * resonate(slug, 110, 70) + 1.08 * resonate(slug, 76, 38)  # muffler and frame
    gulps = strokes(INTAKE_SHARE, intake_db, INTAKE_LAG_S)
    suck = intake(gulps, width_s=0.0017, airbox_db=-15.5, lead=1.63, wander=0.1, t60_s=0.04)
    return cut(boom, 32, "high", order=1) + 1.06 * suck


def squeal():
    """A narrow, very high hiss that swells once a cycle while the machine slows."""
    hiss = unit(cut(rng.standard_normal(N), [12200, 12500], "band", order=1))
    swell_db = 5 * np.cos(2 * np.pi * curve(CRANK)[0])
    return undb(-62.5 + swell_db + 3.0 * walk(25)) * curve(SQUEAL)[0] * hiss


def yard(x, t60_s, tail_db, top_hz):
    """House wall and parked cars scatter a quick diffuse echo and a thin tail: decaying noise."""
    tail = (fade(t60_s) + undb(tail_db) * fade(1.7)) * (T[:SR] > 0.004)
    response = cut(rng.standard_normal(SR) * tail, top_hz, "low", order=1)
    return convolve(x, cut(response / np.linalg.norm(response), 220, "high", order=1))


def scene():
    """Machine nearly straight ahead; echoes, wind and town give width, and the top treble stays wide."""
    machine = cranking() + firing() + valve_gear() + clatter() + cord() + drum()
    machine = machine + clicks() + clacks() + pawls() + handle() + rustles() + squeal()
    near_echo = undb(-13.5) * yard(machine, t60_s=0.25, tail_db=-28.5, top_hz=5000)
    mid = machine + near_echo + wind() + thumps() + leaves() + town()
    lag = -undb(-10) * np.gradient(machine)  # machine reaches the left a fraction of a sample later
    echoes = yard(machine, t60_s=0.09, tail_db=-38.5, top_hz=13660)
    side = lag + undb(-15.5) * echoes + undb(-11.5) * wind() + undb(-11.5) * town()
    sparkle = undb(-4) * cut(echoes, 12000, "high", order=8)
    side = side * undb(curve(WIDTH)[0]) + sparkle
    return np.array([mid + side, mid - side])


def record(dry):
    """Round the highest peaks by tanh, then cut the top with a steep low-pass."""
    ceiling = 0.85
    rounded = ceiling * np.tanh(dry / ceiling)
    return signal.sosfilt(signal.ellip(8, 0.2, 70, TOP_HZ, fs=SR, output="sos"), rounded)


dry = scene()
out = record(dry)
dump(out)
```